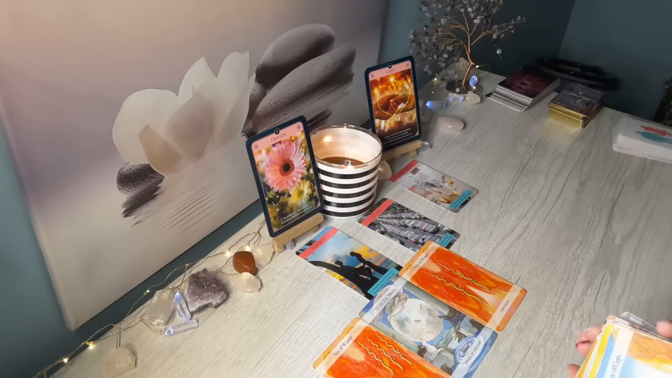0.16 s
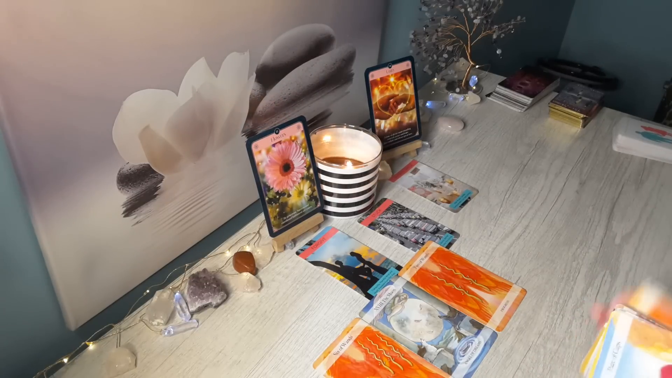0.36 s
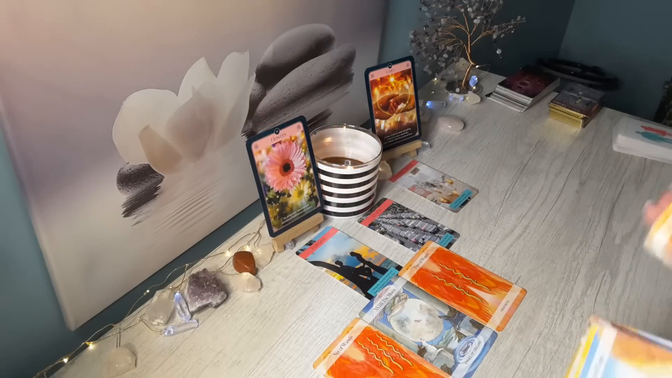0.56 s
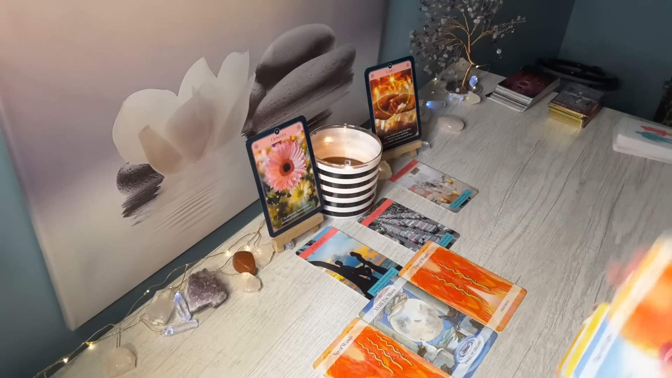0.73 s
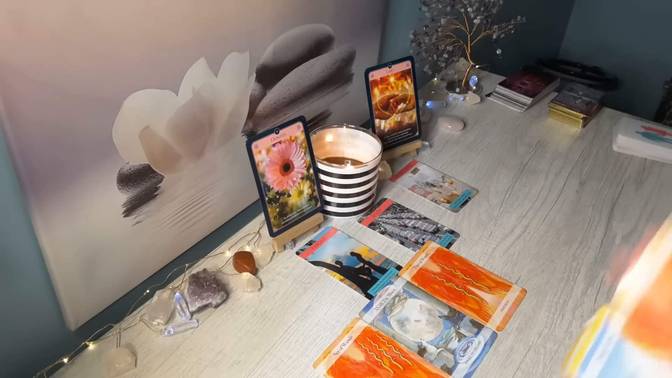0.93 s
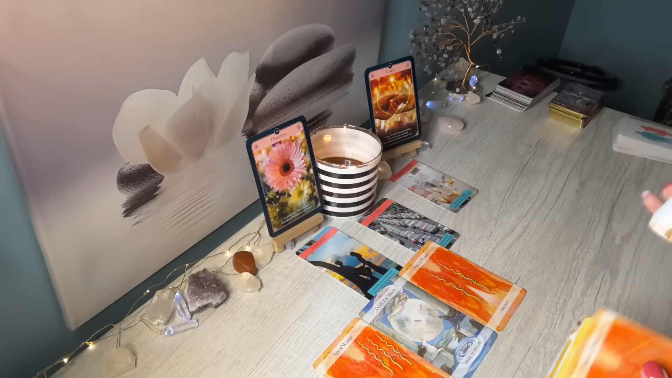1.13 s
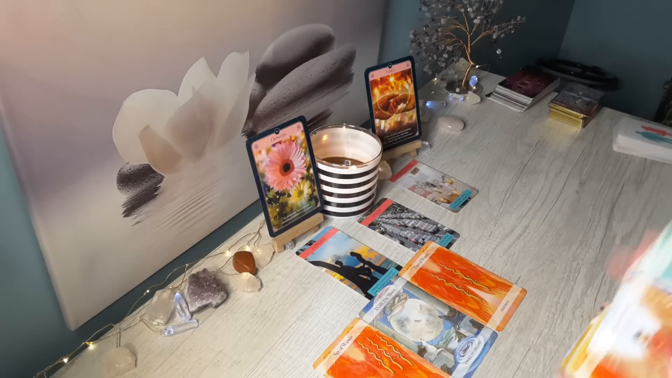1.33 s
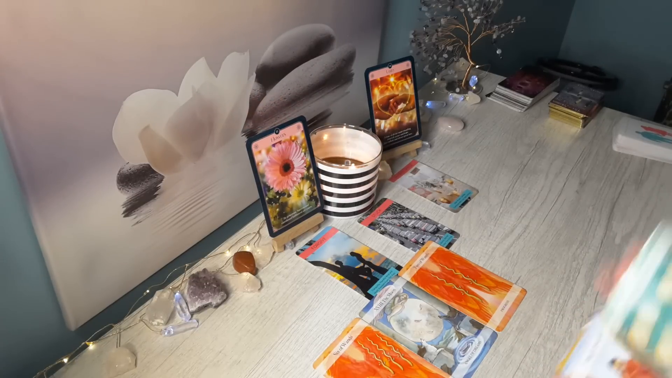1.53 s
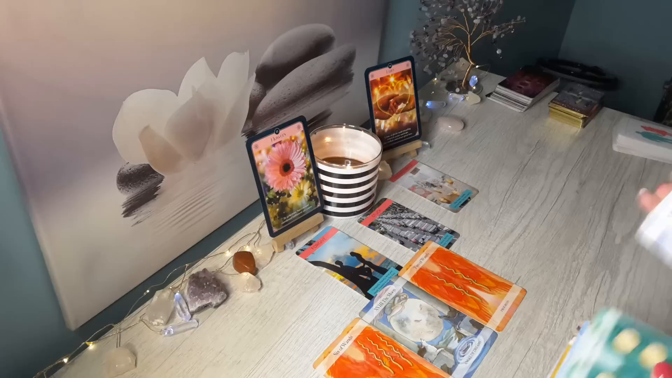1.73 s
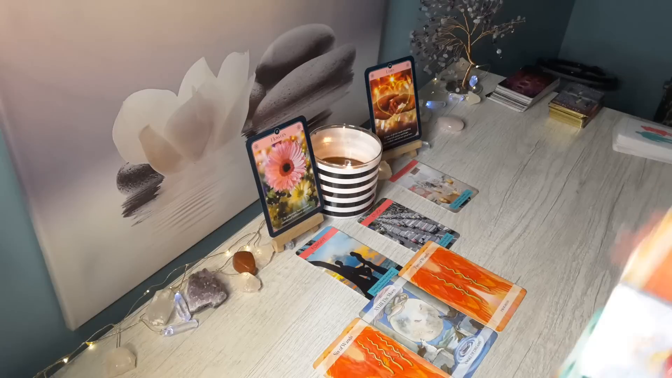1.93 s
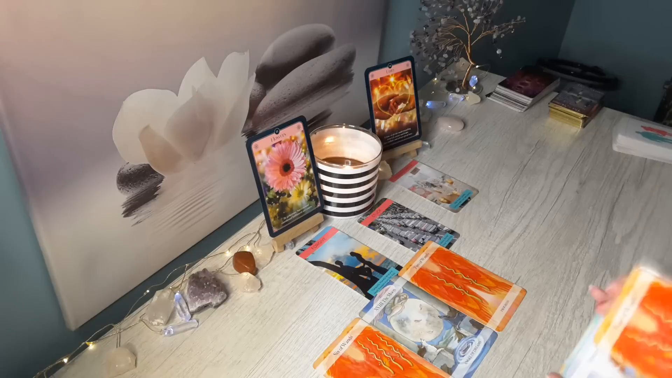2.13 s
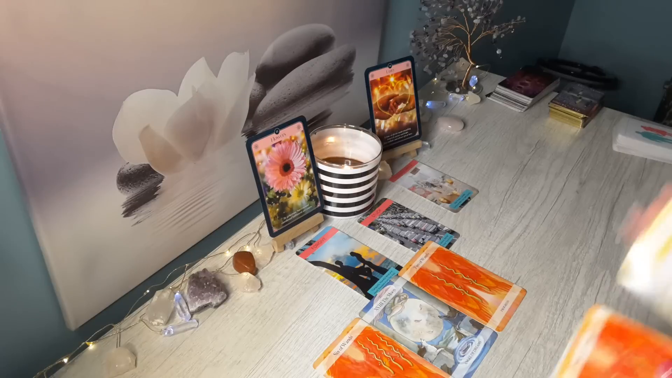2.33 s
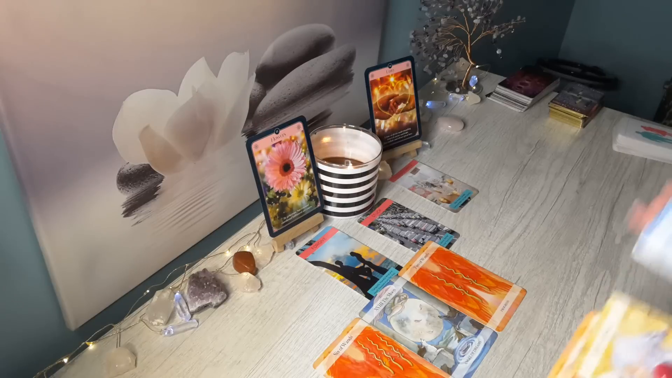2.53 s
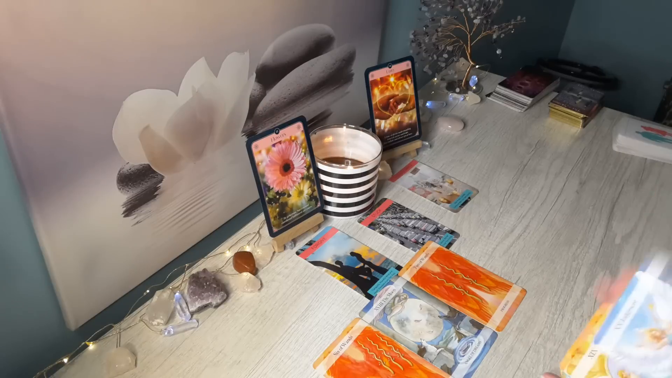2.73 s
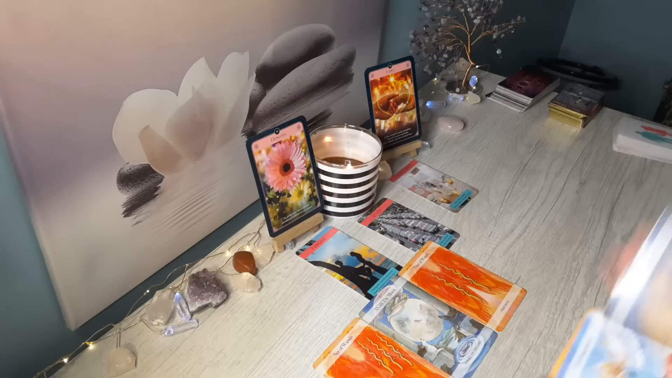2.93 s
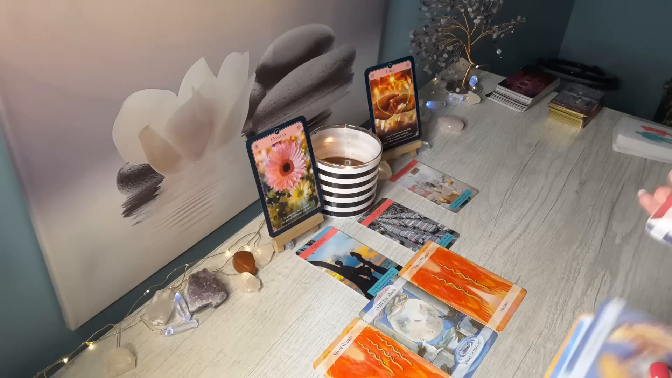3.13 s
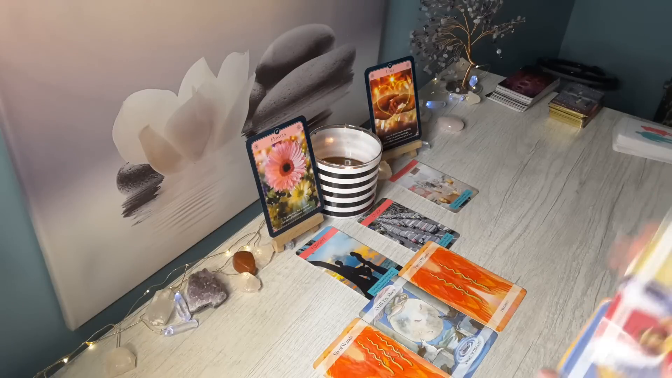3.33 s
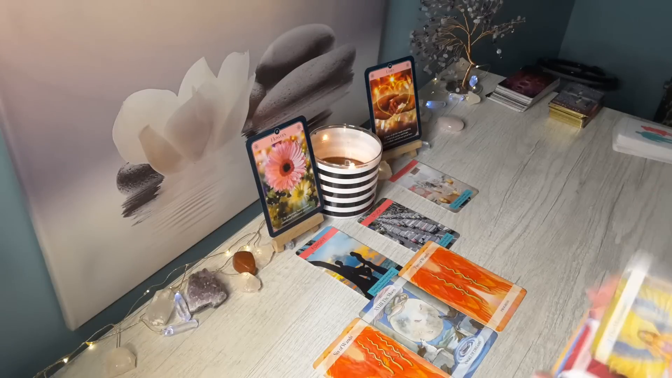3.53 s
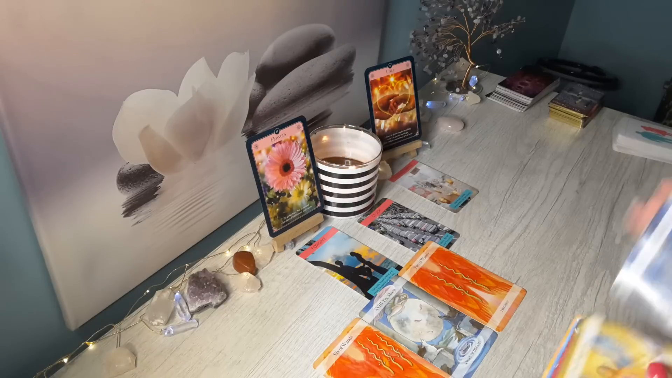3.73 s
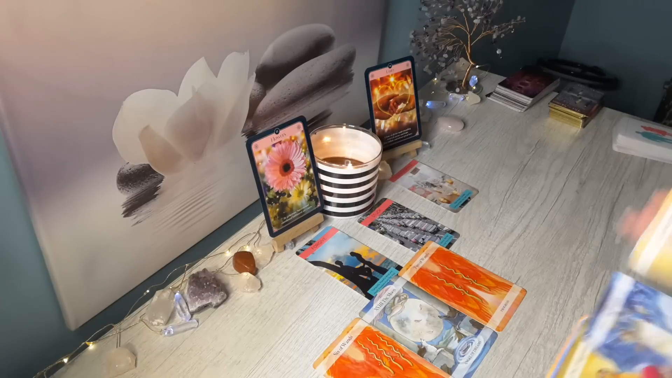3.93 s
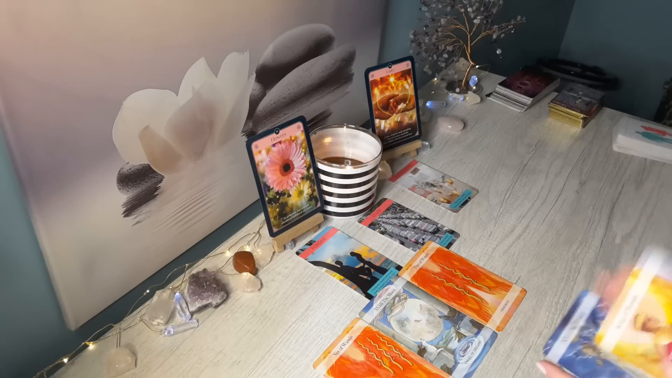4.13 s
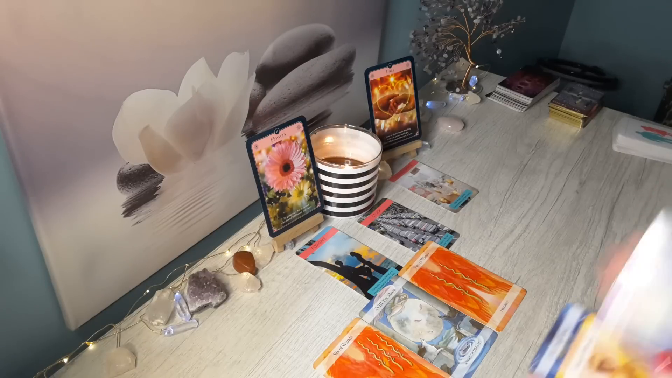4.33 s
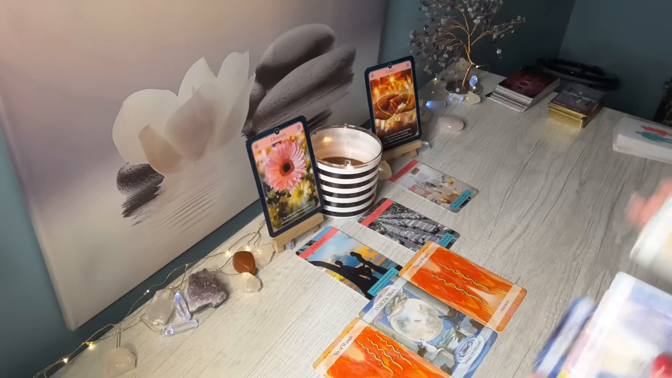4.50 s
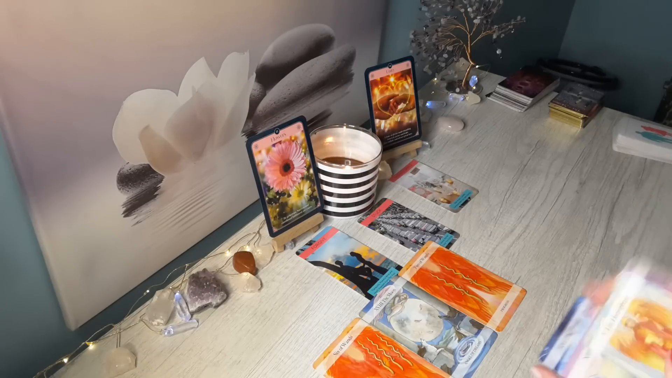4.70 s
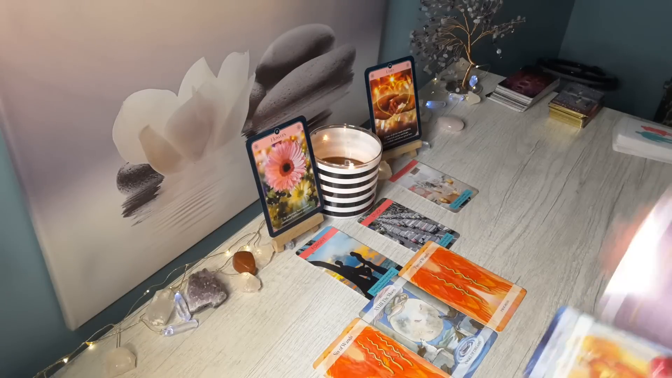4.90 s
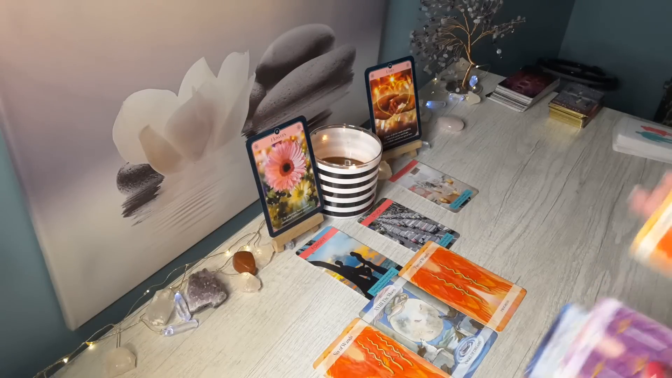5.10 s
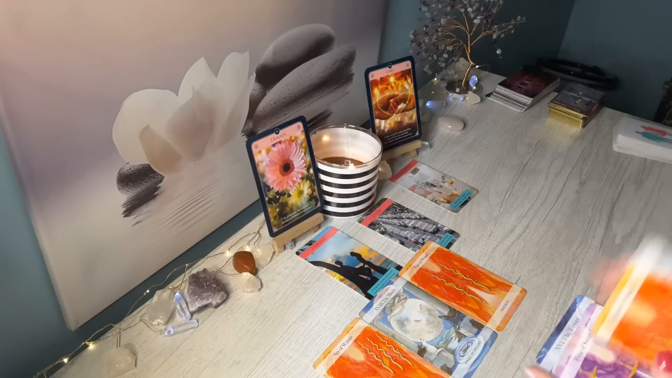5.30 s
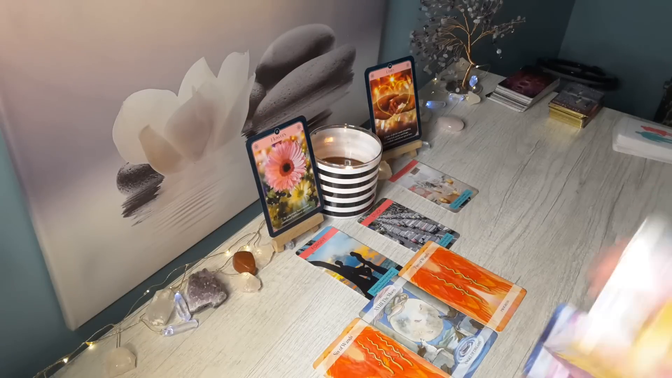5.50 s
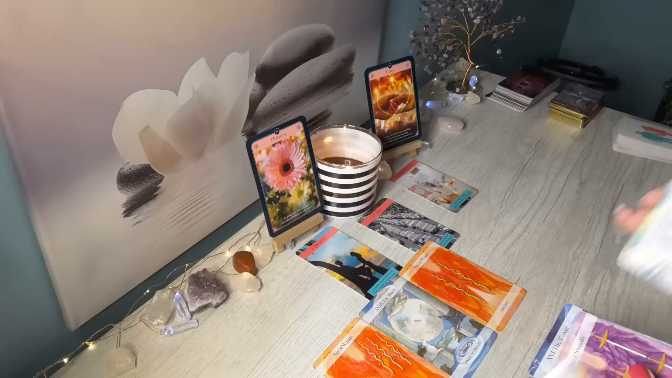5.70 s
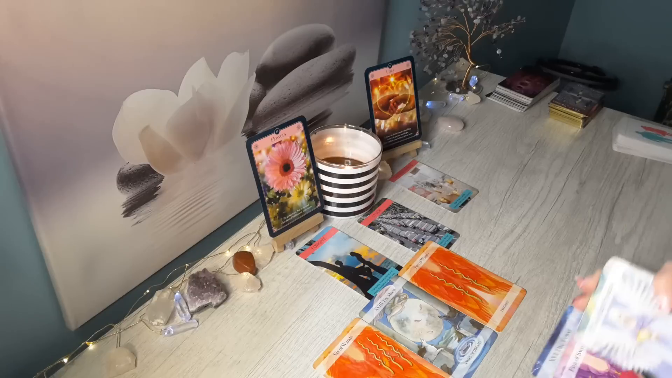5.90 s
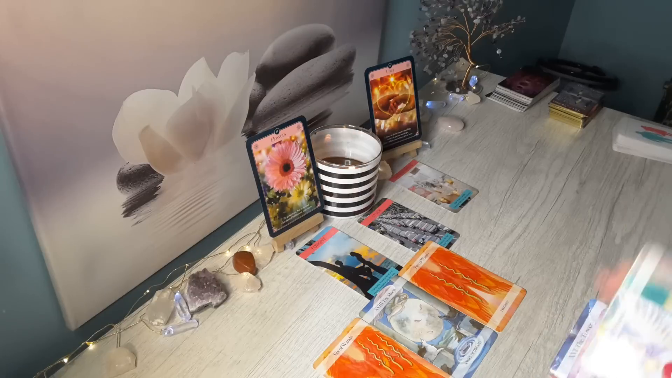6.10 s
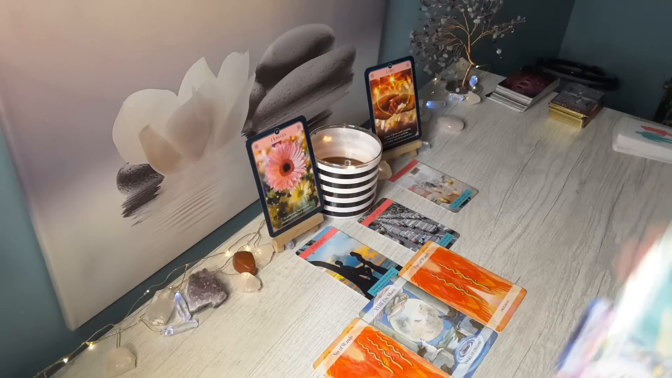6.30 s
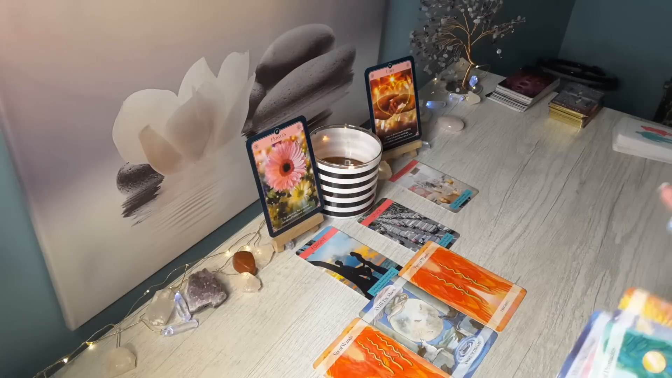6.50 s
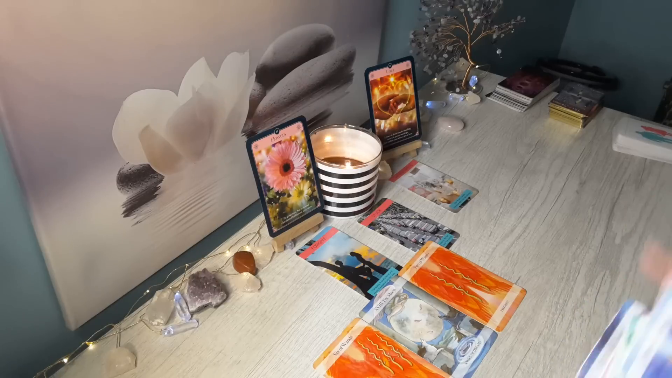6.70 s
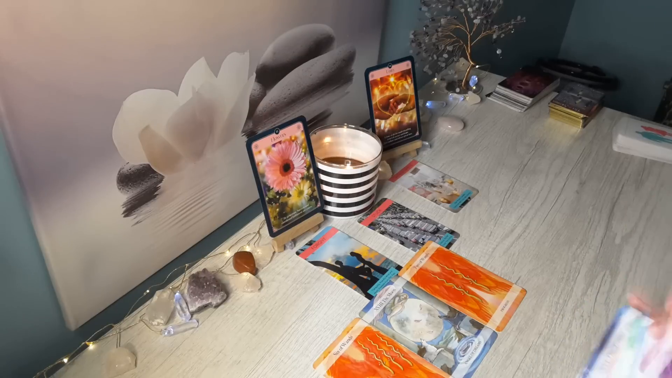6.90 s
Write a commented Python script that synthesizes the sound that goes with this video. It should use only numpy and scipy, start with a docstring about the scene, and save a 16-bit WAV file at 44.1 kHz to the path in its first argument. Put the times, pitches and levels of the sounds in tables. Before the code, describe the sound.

A deck of large cards is shuffled overhand, close to the microphone, in a small quiet room with a faint steady hiss. It begins at about 0.4 seconds with light finger ticks and a soft slide of card on card, followed by a crisp snap at 1.2 seconds. From there the strokes repeat about three and a half times a second: a rub, a bright swish as the packet slips free, then an edge snap or a soft pat in the palm with a little patter of loose cards. The shuffle is fuller from about 2 to 5 seconds. The sharpest snap comes at 5.6 seconds and another at 5.8, then the strokes turn softer until about 6.9 seconds. Each contact has a very short room echo, and the brightest sounds lean to the left.

```python
"""Over a faint hiss, fingers tick on a deck of large cards and draw off a packet: an overhand shuffle
above a desk in a small, quiet room. About 3.5 times a second card rubs on card and swishes as it slips
free; edges snap against the deck, the packet lands with a soft pat and loose cards patter around it.
The room answers each contact; the microphone ports ring near 8 kHz, mostly on the left."""
import sys
import numpy as np
from scipy import signal
from scipy.fft import rfft, irfft, next_fast_len
from scipy.io import wavfile
from scipy.ndimage import uniform_filter1d, map_coordinates

SR = 44100
rng = np.random.default_rng(int(sys.argv[2]) if len(sys.argv) > 2 else 0)


def output_pcm(signal):
    """Save a mono or channel-first signal as 16-bit PCM at the path in sys.argv[1].

    Samples are clipped to [-1, 1] before scaling.
    """
    pcm = np.clip(np.atleast_2d(signal).T, -1, 1) * 32767
    wavfile.write(sys.argv[1], SR, np.round(pcm).astype(np.int16))


N = 306495


def amp(db):
    """Decibels to gain."""
    return 10 ** (np.asarray(db) / 20)


def unit(x):
    """Scale to rms 1."""
    return x / np.sqrt(np.mean(x ** 2) + 1e-20)


def along(points, hz):
    """Read a curve of (freq_hz, value) points on a log frequency axis."""
    freqs, values = np.transpose(points)
    return np.interp(np.log(hz + 1), np.log(freqs + 1), values)


def wobble(rate_hz):
    """Smooth random modulation with rate_hz turning knots a second."""
    knots = rng.standard_normal(int(N * rate_hz / SR) + 4)
    return map_coordinates(knots, [np.arange(N) * rate_hz / SR])


def filtered(x, response):
    """EQ x with a gain given as a function of frequency."""
    size = next_fast_len(N + SR // 2)
    return irfft(rfft(x, size) * response(np.fft.rfftfreq(size, 1 / SR)), size)[..., :N]


def noise(colour):
    """Coloured noise of rms 1."""
    return unit(filtered(rng.standard_normal(N), lambda hz: amp(along(colour, hz))))


def impulse(colour, size=2048):
    """The tightest causal click that has this colour (minimum phase)."""
    cepstrum = irfft(np.log(amp(along(colour, np.fft.rfftfreq(size, 1 / SR)))))
    cepstrum[1:size // 2] *= 2
    cepstrum[size // 2 + 1:] = 0
    return irfft(np.exp(rfft(cepstrum)))


def add(track, start_s, sound):
    """Mix a sound into the track at start_s."""
    part = track[max(round(start_s * SR), 0):][:len(sound)]
    part += sound[:len(part)]


# Colour of the background hiss: freq_hz, gain_db
HISS_EQ = [(20, -18.5), (60, -13), (100, -10), (135, -6), (200, -15.5), (500, -14), (1000, -21),
           (3000, -21.5), (6000, -26), (7300, -24.5), (8200, -30), (11000, -25), (16000, -30)]
def room_tone(level_db):
    """Still air and microphone hiss make a steady bed."""
    return amp(level_db) * noise(HISS_EQ)


def contacts(colour, starts_s, levels_db, hollow_hz, cupped_db, contact_ms, softness):
    """The cards of a packet land one after another: a short, fading cluster of tiny impacts."""
    size, scatter_db, hollow_width, low_cut_ratio = 2048, 3, .26, 0.11
    track, ms = np.zeros(N), np.arange(size) / SR * 1000
    hz = np.fft.rfftfreq(2 * size, 1 / SR)
    tone = rfft(impulse(colour), 2 * size)
    level_span = .003 * SR  # a hit's level is its energy spread over 3 ms
    hits = np.broadcast(starts_s, levels_db, hollow_hz, cupped_db, contact_ms)
    for start_s, level_db, centre_hz, cup_db, length_ms in hits:
        age = ms / length_ms
        fade = age ** softness * np.exp(-age ** 2 / 2)
        # the impacts differ in size, but share their energy evenly among the frequencies
        sizes = amp(scatter_db * map_coordinates(rng.standard_normal(size), [ms]))
        phase = np.angle(rfft(rng.standard_normal(size) * fade * sizes))
        cluster = irfft(np.exp(1j * phase)) * np.sqrt(fade)
        # the air between palm and cards rings briefly, more when the hand is cupped
        damping = 1j * hz * centre_hz * hollow_width
        hollow = 1 + amp(cup_db) * damping / (centre_hz ** 2 - hz ** 2 + damping)
        # a small hollow moves little air, so its pat has less bass
        low_cut = (1j * hz / (1j * hz + low_cut_ratio * centre_hz)) ** 2
        hit = irfft(rfft(cluster, 2 * size) * tone * hollow * low_cut)
        add(track, start_s, amp(level_db) * hit * np.sqrt(level_span / np.sum(hit ** 2)))
    return track


# Three layers of a card hit (dull body, slap of the faces, crisp edge): freq_hz, gain_db
BODY_EQ = [(25, -40), (60, -12), (110, -7.5), (250, -3.5), (450, -3.5), (750, 1), (1100, -11.5), (1600, -9),
           (4000, -66)]
SLAP_EQ = [(100, -56), (400, -75), (850, -5.5), (1300, 2.5), (2200, 4), (3500, 3.5), (5000, -4),
           (8000, -35.5)]
EDGE_EQ = [(300, -73), (2000, -9), (4500, 2), (6500, 0.5), (9500, -1.5), (12000, -7), (16000, -13)]
# Cues for drawing off a packet, levels before each layer's trim:
# start_s, slip_s, grip_db, slide_db, swish_db
DRAW_CUES = [(0.407, 0.53, -71, -64, -60), (0.76, 0.77, -52, -44.5, -54), (0.776, .828, -75, -59, -62),
             (1.0663, 1.173, -58, -57.5, -62), (1.376, 1.47, -66, -57.5, -49),
             (1.655, 1.756, -62, -59.5, -46), (1.945, 2.038, -57.5, -58.5, -51),
             (2.2213, 2.329, -48, -57.5, -40), (2.5018, 2.606, -46.5, -57.5, -47.5),
             (2.787, 2.883, -49.5, -57, -47), (3.058, 3.168, -63, -58, -49.5),
             (3.3526, 3.459, -52, -56, -41.5), (3.6337, 3.751, -50, -55.5, -52),
             (3.882, 3.898, -62, -60, -50.5), (3.949, 4.016, -82, -48, -46),
             (4.1807, 4.297, -46.5, -58, -38.5), (4.4698, 4.581, -46, -56.5, -42.5),
             (4.759, 4.873, -48.5, -57, -42.5), (5.0549, 5.172, -49, -56, -50.5),
             (5.321, 5.454, -53, -58.5, -48), (5.756, 5.839, -65, -56, -52),
             (5.989, 6.09, -58, -61.5, -56.5), (6.1389, 6.266, -65, -58.5, -59),
             (6.44, 6.546, -54, -60.5, -67), (6.7174, 6.831, -55, -59, -64.5)]
def grips(trim_db=-8):
    """Each stroke opens with a small, hollow tick as the fingers take the packet."""
    start_s, _, level_db, *_ = np.transpose(DRAW_CUES)
    gap_hz = 1860  # the narrow gap between fingers and deck
    under_db = level_db + trim_db
    slap = contacts(SLAP_EQ, start_s, level_db, gap_hz, cupped_db=9, contact_ms=2.1, softness=0.079)
    body = contacts(BODY_EQ, start_s, under_db, gap_hz, cupped_db=-4, contact_ms=2.6, softness=0.11)
    edge = contacts(EDGE_EQ, start_s, under_db, gap_hz, cupped_db=-9, contact_ms=4.2, softness=0.21)
    return slap + body + edge


def friction_noise(colour, drift_db):
    """Friction noise of rms 1 whose colour drifts as the cards bend and the contact moves."""
    bands = signal.stft(noise(colour), nperseg=256)[2]
    drift = uniform_filter1d(rng.standard_normal(bands.shape), size=7, axis=0)
    drift = unit(uniform_filter1d(drift, size=9, axis=1))
    return unit(signal.istft(bands * amp(drift_db * drift), nperseg=256)[1][:N])


# Colour of card rubbing on card: freq_hz, gain_db
RUB_EQ = [(30, -45), (100, 0), (250, 1), (700, -2), (1200, -7), (1800, -6), (3500, -3.5), (6000, 1),
          (8500, 4), (11000, 1), (16000, -7.5)]
def sliding(grain_db=3, uneven_db=3, ticks_per_s=170, tick_db=-9, trim_db=-3):
    """Card rubs on card at an uneven hand speed; edges catch with tiny, dull ticks."""
    attack_s, release_s = 0.0054, 0.014
    scuff_db, scuff_s = -3, 0.0067  # the fingers scuff the cards as they take hold
    creep_db, creep_s, speed_up_s = -7, 0.032, 0.022  # the packet creeps, then is pulled up to speed
    envelope, age = np.zeros(N), np.arange(SR // 2) / SR
    attack = np.clip(age / attack_s, 0, 1)
    creeping = 1 - np.clip((age - creep_s) / speed_up_s, 0, 1)
    for start_s, slip_s, grip_db, slide_db, _ in DRAW_CUES:
        scuff = amp(grip_db + scuff_db) * np.exp(-age / scuff_s)
        pull = amp(slide_db + creep_db * creeping)
        release = np.exp(-np.maximum(start_s + age - slip_s, 0) / release_s)
        add(envelope, start_s, attack * (scuff + pull) * release)
    roughness = unit(amp(grain_db * wobble(1600) + uneven_db * wobble(55)))
    rub = roughness * friction_noise(RUB_EQ, drift_db=2.5)
    catches = (rng.random(N) < ticks_per_s / SR) * rng.random(N)
    ticks = unit(signal.fftconvolve(catches, impulse(SLAP_EQ))[:N])
    return amp(trim_db) * envelope * (rub + amp(tick_db) * ticks)


# Bright colour of a packet slipping free: freq_hz, gain_db
SWISH_EQ = [(50, -55), (300, -19.5), (1500, -15.5), (4000, -7), (7000, -2.5), (10000, -0.5), (13000, -8),
            (16000, -17)]
def swishes(half_width_s=0.0061, grain_db=3, puff_db=-7, trim_db=-1.5):
    """The friction swells and brightens as a packet slips free and pushes out a dull puff of air."""
    t = np.arange(N) / SR
    swell = sum(amp(swish_db) * np.exp(-.5 * ((t - slip_s) / half_width_s) ** 2)
                for _, slip_s, _, _, swish_db in DRAW_CUES)
    hiss = unit(amp(grain_db * wobble(600))) * friction_noise(SWISH_EQ, drift_db=0.8)
    return amp(trim_db) * swell * (hiss + amp(puff_db) * noise(BODY_EQ))


def landing(start_s, level_db, hollow_hz, cupped_db, contact_ms, softness):
    """A packet meets the hand: its bulk pats and its faces slap, balanced by the shape of the palm."""
    even_hz, tilt_db_per_octave, cup_boost_db = 797, 1.78, 1
    tilt_db = tilt_db_per_octave * np.log2(hollow_hz / even_hz)  # flatter hand: higher hollow, more slap
    shape = hollow_hz, cupped_db + cup_boost_db, contact_ms, softness
    body = contacts(BODY_EQ, start_s, level_db - tilt_db, *shape)
    slap = contacts(SLAP_EQ, start_s, level_db + tilt_db, *shape)
    return body + slap


# Cues for card edges striking the deck: start_s, knock_db, edge_db, hollow_hz, cupped_db
SNAP_CUES = [(0.5683, -54, -53.5, 1770, -2), (1.201, -37.5, -37, 3560, -9), (1.519, -48.5, -58, 2370, 4),
             (1.5245, -51.5, -44, 272, -3), (1.8023, -38, -38.5, 780, 7), (2.0844, -46, -45.5, 644, 13),
             (2.0911, -58, -52, 614, -8), (2.3208, -37.5, -45, 720, 10), (2.3853, -43, -45, 660, -1),
             (2.6454, -40.5, -45, 1070, 12), (2.9336, -39.5, -33.5, 614, 3),
             (3.2122, -39.5, -35.5, 686, -6), (3.4954, -40, -49, 550, 5), (3.7881, -39.5, -41, 730, 3),
             (3.8807, -43.5, -57, 630, 2), (4.0059, -32.5, -37, 920, 3.5), (4.3335, -35, -35.5, 714, 0),
             (4.6333, -45, -50, 850, -10), (4.9044, -41.5, -38.5, 310, -15), (5.2039, -44.5, -38, 320, -3),
             (5.3321, -56.5, -45.5, 3440, -19), (5.4712, -47, -47.5, 514, 5),
             (5.5904, -29, -29.5, 2240, 1.5), (5.6009, -37, -33.5, 1700, 22), (5.707, -49, -53, 468, 5),
             (5.802, -47, -48, 1970, 2), (5.8157, -31.5, -40.5, 1180, 9.5), (5.8778, -49, -45.5, 1520, -20),
             (5.9815, -59.5, -44.5, 2380, 10), (6.1389, -65, -52.5, 2400, 11),
             (6.2825, -56.5, -46.5, 232, -15), (6.863, -49.5, -54.5, 226, 6)]
def snaps(even_contact_ms=1.6, halving_db=25, edge_cup_db=-17):
    """Edges hit the deck with a knock and a crisp snap, shorter the more squarely they strike."""
    start_s, knock_db, edge_db, hollow_hz, cupped_db = np.transpose(SNAP_CUES)
    contact_ms = even_contact_ms * 2 ** ((knock_db - edge_db) / halving_db)
    knock = landing(start_s, knock_db, hollow_hz, cupped_db, contact_ms, softness=0.11)
    edge = contacts(EDGE_EQ, start_s, edge_db, hollow_hz, cupped_db + edge_cup_db, contact_ms,
                    softness=0.19)
    return knock, edge


# Cues for packets landing flat in the palm: start_s, level_db, hollow_hz, cupped_db
PAT_CUES = [(1.1213, -55, 660, -8), (1.177, -46, 624, -6), (1.4395, -52, 1540, 9), (1.4607, -49.5, 1220, 1),
            (1.4884, -49.5, 520, -2), (1.739, -44, 330, 0), (1.777, -46.5, 600, 0), (2.016, -53, 320, -3),
            (2.0595, -48.5, 710, -8), (2.3158, -40.5, 474, 8), (2.624, -46, 810, 21),
            (2.871, -47.5, 1520, 19), (2.8785, -44, 520, 11), (2.901, -39, 524, -1), (3.074, -56, 520, 5),
            (3.184, -43.5, 1390, 1), (3.472, -42, 540, 4), (3.7701, -42, 780, -5), (3.918, -54, 1940, 11),
            (4.2697, -44, 1550, 10), (4.31, -42, 2460, 9), (4.5729, -35, 1680, -1), (4.6, -46, 690, -7),
            (4.88, -40, 1490, -3), (5.0964, -54, 2000, 5), (5.179, -39, 2170, 19), (6.2775, -45.5, 230, 0),
            (6.5695, -51, 228, 7)]
def pats():
    """The freed packet lands flat on a cushion of air, so its pat sets in softly."""
    return landing(*np.transpose(PAT_CUES), contact_ms=4.36, softness=0.31)


def patter(cards=5, lead_s=0.0073, window_s=.022, trim_db=-16, centre_hz=940):
    """A few loose cards drop around each packet, softer than it and each at its own pitch."""
    spread_db, spread_octaves = 0.5, 0.94
    pat_s, pat_db, *_ = np.repeat(PAT_CUES, cards, axis=0).T
    delay, strength, pitch = rng.random((len(pat_s), 3)).T
    start_s = pat_s - lead_s + window_s * delay
    level_db = pat_db + trim_db + spread_db * (2 * strength - 1)
    hollow_hz = centre_hz * 2 ** (spread_octaves * (2 * pitch - 1))
    return landing(start_s, level_db, hollow_hz, cupped_db=6, contact_ms=1.75, softness=0.28)


# Reverb time of the small room: freq_hz, t60_s
REVERB_DECAY = [(150, 0.15), (400, 0.23), (1040, 0.32), (2760, 0.25), (7280, 0.26), (15000, 0.2)]
# Colour of its reflections: freq_hz, gain_db
REVERB_EQ = [(30, 4), (70, -6.5), (140, 9), (310, 1.5), (410, -6.5), (500, 2.5), (700, -2), (1200, 1.5),
             (2000, -2), (3500, 0.5), (6000, -2.5), (9000, -1.5), (16000, -4)]
def room_tail(build_s=0.0011):
    """Diffuse reflections build up quickly and die at their own speed at each frequency."""
    hz, t, bands = signal.stft(rng.standard_normal(SR // 2), SR, nperseg=256)
    decay = amp(-60 * t / along(REVERB_DECAY, hz)[:, None])
    energy = np.sum(decay ** 2, axis=1, keepdims=True) * t[1] * SR
    decay *= amp(along(REVERB_EQ, hz))[:, None] / np.sqrt(energy)
    tail = signal.istft(bands * decay, SR, nperseg=256)[1]
    return tail * np.clip(np.arange(len(tail)) / (build_s * SR) - .5, 0, 1)


# Low ring of desk and walls: pitch_hz, relative_db, t60_s
ROOM_MODES = [(233, 3.5, 0.56), (331.7, 18, 0.058), (522, 9, 0.37), (707, 10.5, 0.15)]
def room(send, ring_db=-61, wet_db=-1, tails=28):
    """The hands keep moving, so the reflections change; a few low resonances stay put."""
    wet, start = np.zeros(N), 0
    for piece in np.array_split(send, tails):
        add(wet, start / SR, signal.fftconvolve(piece, room_tail()))
        start += len(piece)
    t = np.arange(SR // 2) / SR
    ring = sum(amp(db - 60 * t / t60_s) * np.sin(2 * np.pi * hz * t) for hz, db, t60_s in ROOM_MODES)
    return amp(wet_db) * wet + amp(ring_db) * signal.fftconvolve(send, ring)[:N]


# Stereo width, the share of the reflections that differs between the ports: freq_hz, side_db
WIDTH_EQ = [(200, -37), (700, -33), (3000, -34), (12000, -22)]
def scene():
    """Cards, room and still air reach two close microphones almost alike; the snaps are a bit drier."""
    knocks, edges = snaps()
    hits = knocks + grips() + pats() + patter()
    friction = sliding() + swishes()
    send = hits + amp(-1.5) * edges + amp(-0.4) * friction
    mid = hits + edges + friction + room(send) + room_tone(-70.5)
    side = filtered(room(send), lambda hz: amp(along(WIDTH_EQ, hz))) + room_tone(-85.5)
    return np.array([mid + side, mid - side])


# Treble ring of the microphone ports: freq_hz, gain_db
PORT_EQ = [(5800, 0), (6900, 3), (7600, 9), (8200, 15.5), (8800, 8.5), (10000, 3), (12000, 3.5)]
# How much louder the left port is: freq_hz, left_minus_right_db
PORT_BALANCE = [(250, 0), (700, -.4), (1400, -.1), (2300, 3.2), (4400, 3.7), (5600, 6), (7500, 13.5),
                (9400, 8.5), (10500, 0), (14000, -1)]
def record(dry, top_hz=16050):
    """The ports ring in the treble, the left one more; nothing is kept above top_hz."""
    rung = signal.fftconvolve(dry, impulse(PORT_EQ)[None], axes=1)[:, :N]
    pan = lambda hz: 2 / (1 + amp(np.outer([-1, 1], along(PORT_BALANCE, hz))))
    return filtered(rung, lambda hz: pan(hz) * (hz < top_hz))


dry = scene()
out = record(dry)
output_pcm(out)
```